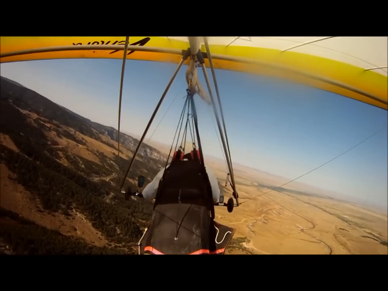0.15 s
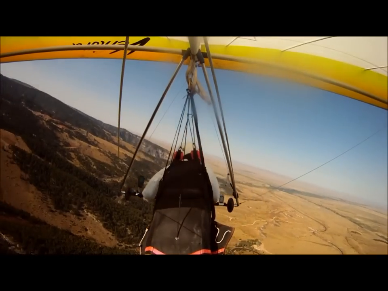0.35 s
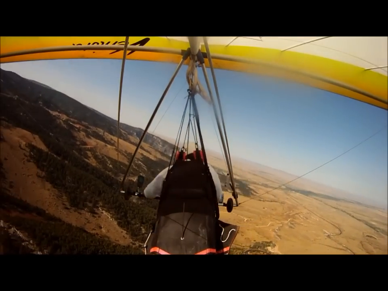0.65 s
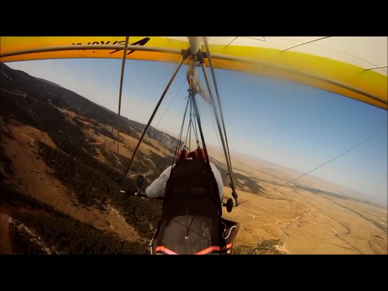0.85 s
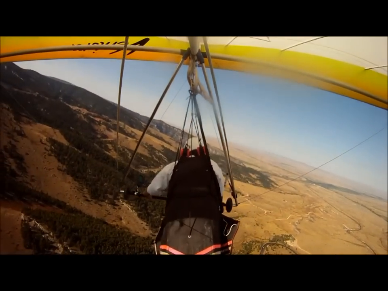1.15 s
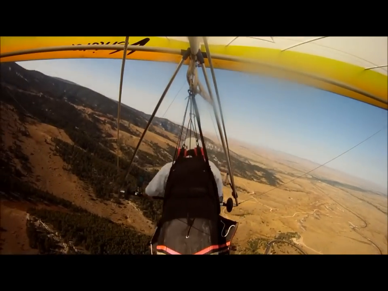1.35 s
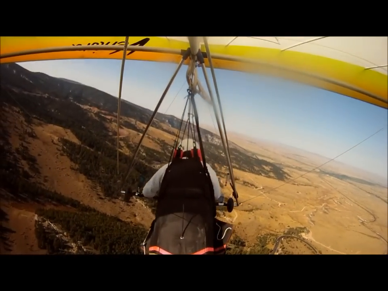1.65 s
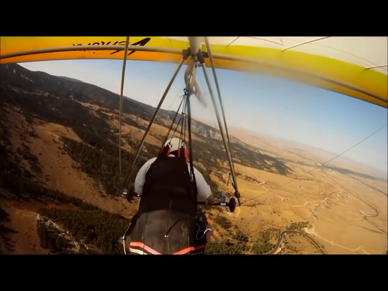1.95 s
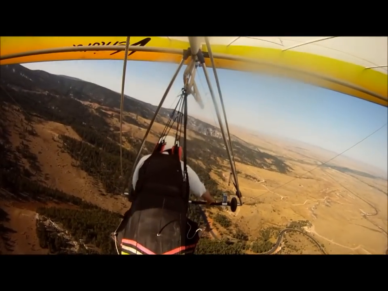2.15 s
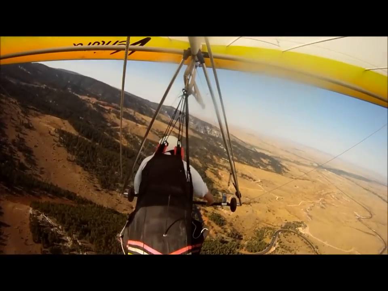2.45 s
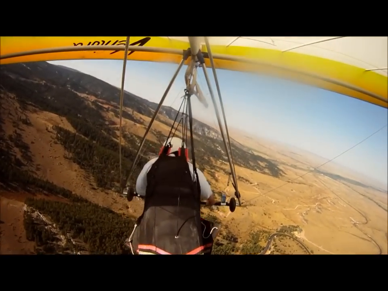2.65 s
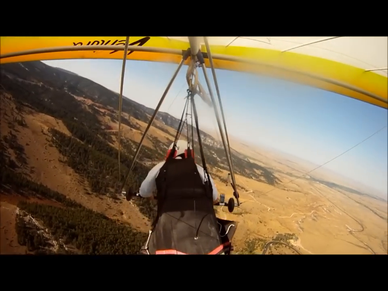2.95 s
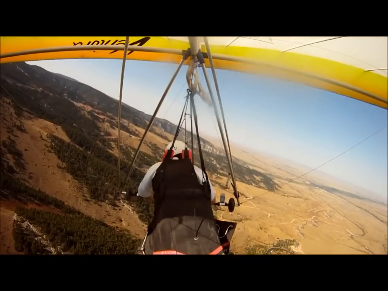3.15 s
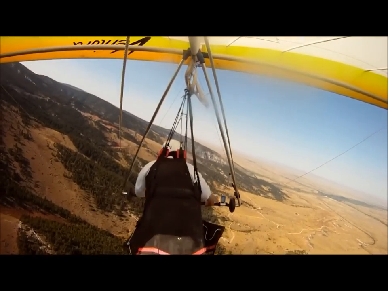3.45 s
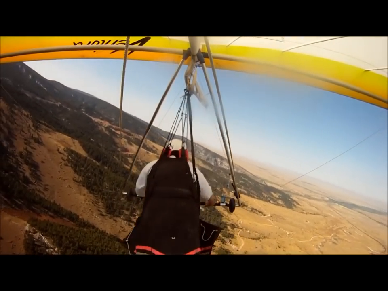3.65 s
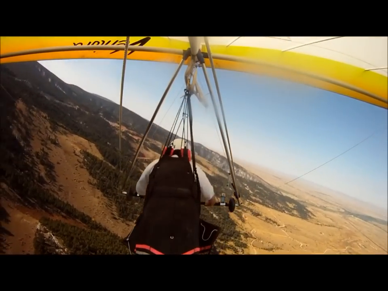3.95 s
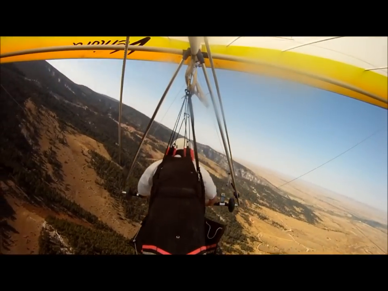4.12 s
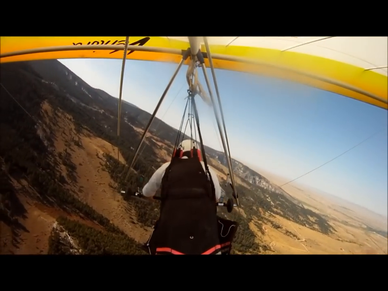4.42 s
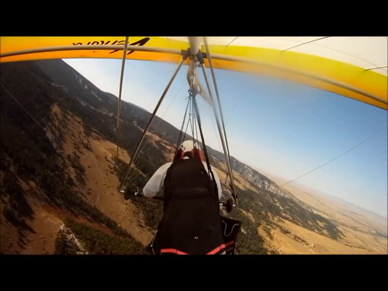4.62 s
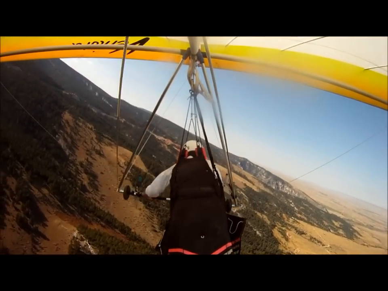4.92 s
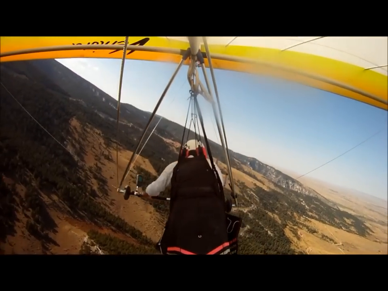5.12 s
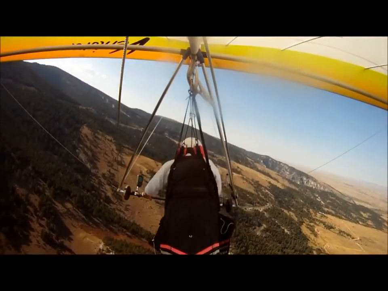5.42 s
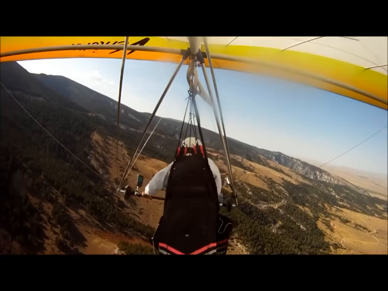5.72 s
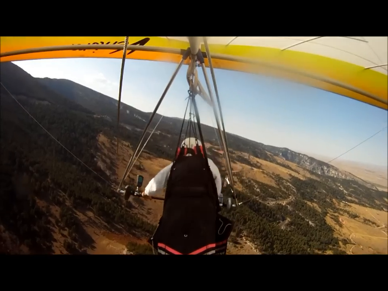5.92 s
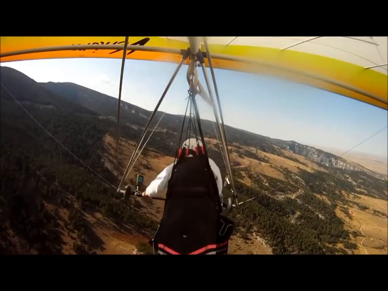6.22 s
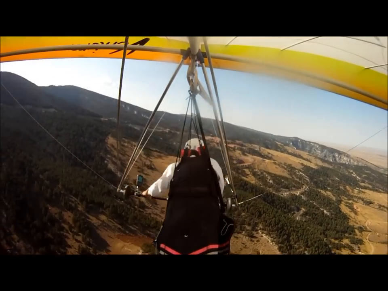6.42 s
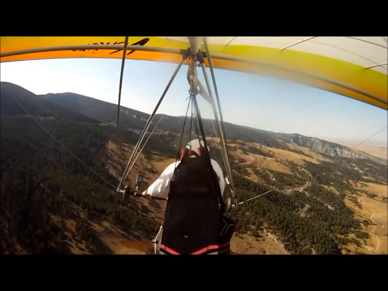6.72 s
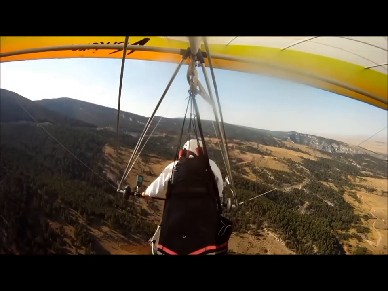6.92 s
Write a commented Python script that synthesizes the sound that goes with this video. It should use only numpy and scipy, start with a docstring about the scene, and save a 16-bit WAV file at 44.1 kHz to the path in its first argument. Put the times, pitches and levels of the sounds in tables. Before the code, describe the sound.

Gusty air buffets a hang glider in flight, with a deep shuddering drone and bursts of plastic rattling from a camera mount.

```python
"""Wind rushes over a camera in a plastic case that rides on the keel (spine) of a hang glider.
Swirls of air shake the mount, so it rumbles, drones and booms, while the keel gives a deep shudder.
In rough air the case knocks and chatters on its mount, and each hit makes the plastic ring.
The microphone adds a faint hiss. The recorder holds each sample at a low rate,
which mirrors the sound into a gritty treble."""
import sys
import numpy as np
from scipy import signal
from scipy.fft import rfft, irfft
from scipy.io import wavfile
from scipy.ndimage import uniform_filter1d

SR = 44100
rng = np.random.default_rng(int(sys.argv[2]) if len(sys.argv) > 2 else 0)


def master(y):
    """Save y as 16-bit WAV."""
    cut = np.clip(np.atleast_2d(y).T, -1, 1)
    pcm = np.round(cut * 32767)  # scale
    wavfile.write(sys.argv[1], SR, pcm.astype(np.int16))


N = 311787

# Strength of the wind over the case. Each row: time in seconds, relative level in dB.
WIND_LEVELS = [(0.0, -46), (0.5, -53.5), (0.65, -49.5), (0.9, -50.5), (1.43, -44.5), (2.35, -42),
               (2.45, -48), (2.6, -43.5), (2.89, -39), (3.3, -40.5), (3.98, -34), (4.03, -40.5),
               (4.65, -43.5), (5.3, -48.5), (5.38, -41), (6.05, -37), (6.7, -38), (7.07, -39.5)]
# Hollows and edges that sing in the wind. Each row: pitch in Hz, width in Hz, relative level in dB.
WIND_TONES = [(605, 260, -37), (736, 350, -16.5), (995, 115, -6), (1135, 108, -5), (1512, 400, -10.5),
              (1978, 127, -0.5), (2150, 330, -4), (2484, 130, -8), (2790, 1280, -18.5), (3200, 170, -24),
              (3542, 260, -10.5), (3740, 280, -18.5), (4200, 380, -34), (4820, 330, -29), (5150, 280, -26)]
# How hard the air shakes the mount. Each row: time in seconds, relative level in dB.
SHAKE_LEVELS = [(0.0, -41), (0.3, -39.5), (0.85, -41.5), (1.78, -41), (1.9, -37), (2.55, -39.5), (4.0, -36),
                (4.8, -38.5), (5.7, -38.5), (6.35, -37.5), (7.07, -38)]
# Deep tones of the mount and frame. Each row: pitch in Hz, width in Hz, relative level in dB.
FRAME_TONES = [(52.3, 47, -2), (71, 18, -4), (88.2, 6.1, 3), (105, 13, -3), (127.5, 19, 1),
               (169.6, 52, -1.5)]
# Higher tones of the mount, which roar. Each row: pitch in Hz, width in Hz, relative level in dB.
ROAR_TONES = [(267, 13, 0), (307.6, 34, 1), (362.7, 118, -4)]
# Swirls of air that slap the mount and make it boom. Each row: time of the peak in seconds, level in dB.
AIR_SLAPS = [(0.755, -33), (2.25, -29.5), (2.34, -28.5), (2.47, -32), (2.951, -30.5), (3.13, -34.5),
             (3.48, -27.5), (3.75, -31), (4.27, -30), (4.71, -35.5), (6.38, -31.5)]
# Strength of the keel's shudder. Each row: time in seconds, relative level in dB.
SHUDDER_LEVELS = [(0.0, -33), (0.45, -39), (1.0, -31.5), (1.5, -27), (1.9, -33.5), (2.0, -21.5),
                  (2.47, -21), (2.77, -43.5), (3.35, -27.5), (3.75, -27), (4.0, -34), (4.7, -35),
                  (5.42, -22.5), (5.8, -31), (6.05, -26), (6.58, -34), (6.98, -20.5), (7.07, -29)]
# Speed of that shudder. Each row: time in seconds, rate in Hz.
SHUDDER_RATES = [(2.55, 24.9), (2.75, 28), (3.48, 25.97), (4.17, 26.36), (4.35, 31.35), (4.98, 24.75)]
# Louder knocks of the case on its mount.
# Each row: start in seconds, relative level in dB, hollowness from 0 (dry) to 1, brightness in dB.
CASE_KNOCKS = [(0.051, -29, 0.46, -3), (0.19, -36.5, 0.43, -19), (0.339, -37.5, .45, -30),
               (0.725, -19, 0.87, 2), (0.793, -34, 0.5, -4), (0.807, -29.5, 0.84, 2),
               (0.949, -27.5, 0.88, 1.5), (0.965, -29, 1, -2), (0.997, -25.3, .4, -5),
               (1.014, -26.5, 0.98, 3), (1.096, -27.5, 0.88, 2), (1.126, -27, 0.47, -14),
               (1.226, -28.2, 0.53, -13), (1.388, -32.5, 0.65, -35), (1.862, -28.5, 1, 4),
               (2.136, -33.6, 0.2, 3), (1.968, -25, .3, 7), (2.035, -25, 0.85, 2), (2.165, -24, 0.5, 4),
               (2.178, -26.5, 0.63, -7), (2.195, -24, 0.34, 3), (2.216, -19, .65, -2),
               (2.245, -24, 0.72, 4), (2.288, -25, 0.33, 4), (2.539, -24.5, 0.88, 1),
               (2.732, -31.5, 0.14, 3), (2.802, -22, 0.17, 4), (2.864, -30.5, 0.43, -7),
               (2.948, -28.5, .55, 1), (3.146, -30, 0.4, -17), (3.253, -27, 0.78, -6),
               (3.269, -24, 0.5, -13), (3.448, -21, 0.64, 0), (3.574, -28, 0.2, -16),
               (3.617, -16.5, 0.1, 4), (3.746, -22, 0.16, -13), (3.877, -25, 0.3, -15),
               (4.196, -24, 0.37, 5), (4.417, -24, 0.87, 3), (4.456, -21.5, .7, -3), (4.481, -27, 0.6, -2),
               (4.497, -21, 0.18, -10), (4.559, -20, 0.62, -8.5), (4.682, -26, 0.85, 3.5),
               (4.806, -30, 0.72, -2), (4.853, -27, 0, 3), (4.9041, -19, 0.74, -6.5),
               (4.94, -21, 0.63, -11), (4.991, -19, 0.78, -5), (5.169, -24, 0.69, -1.5),
               (5.284, -33, 0.9, -7), (6.305, -26, 0.01, 10.5), (6.39, -25, 1, 0.5),
               (6.623, -24.5, .65, -18), (6.665, -31, 0.84, -2), (6.843, -25, 0.33, 1.5),
               (6.937, -36, 1, -12)]
# Spells of fine chatter.
# Each row: start and end in seconds, relative level in dB, hollowness from 0 to 1, brightness in dB.
CHATTER_SPELLS = [(1.019, 1.055, -34.5, 1, -2), (1.855, 1.925, -28.5, 1, -2),
                  (1.925, 2.076, -25.5, 0.73, -1.5), (2.295, 2.34, -25.5, 1, 2),
                  (2.544, 2.568, -28, 0.94, 3), (3.286, 3.358, -29.5, 0.94, -7),
                  (4.51, 4.637, -28.5, 1, 1.5), (4.886, 4.959, -28.5, .86, -6),
                  (4.996, 5.015, -30.5, 0.7, -8), (6.461, 6.575, -28.5, 1, 3)]
# Tones at which the case rings; narrow ones ring longer.
# Each row: pitch in Hz, width in Hz, relative dB at hollow = 0, relative dB at hollow = 1.
# Dry knocks ring about halfway between the two levels, the hollowest ones beyond the second.
CASE_TONES = [(677, 82, -10.5, -5.5), (1066, 22, -11, -6), (1129, 83, -1, 1), (1448, 124, -15.5, -6.5),
              (1757, 56, -8, -9), (1883, 80, 6, -10.5), (2050, 64, 18, -13), (2132, 29, 6, -11),
              (2419, 100, -0.5, -3.5), (2938, 100, -1.5, -16.5), (3340, 320, 9.5, -14),
              (3390, 130, -15.5, -31)]

GROUP_SPLITS_HZ = (1330, 2300)  # these divide the case's tones into low, middle and high
# Each pair: the value for a dry knock, then for a hollow one. The dB are relative to the middle tones.
LOW_TONES_DB, HIGH_TONES_DB, RISE_S = (-19, 9.5), (-11.5, 3.5), (0.0013, 0.0027)


def wind_rush(level_db=2.5, flutter_db=2.0, low_follow=0.55, split_hz=1750, smoothing=0.35):
    """Air rushes over the case: weak wind flutters, strong wind is smoother and brighter."""
    rush = resonant_noise(WIND_TONES)
    low = signal.sosfiltfilt(signal.butter(4, split_hz, fs=SR, output="sos"), rush)
    wind_db = curve(WIND_LEVELS)
    gust_db = wind_db - wind_db.mean()
    sound = low * amp(low_follow * gust_db) + (rush - low) * amp(gust_db)
    flicker_db = flutter_db * amp(-smoothing * gust_db) * flutter(60)
    return sound * amp(level_db + wind_db.mean() + flicker_db)


def mount_shaking(jolt, frame_db=1.07, drone_db=-1.8, roar_db=-11.5, lumps_db=1.5, boom_s=0.028,
                  drone_hz=211, drone_width_hz=29, drone_follow=0.88, jolt_roar_db=-12, jolt_drone_db=-9):
    """Swirls of air shake frame and mount, big ones boom, and the rattling case adds jolts."""
    t = np.arange(N) / SR
    lumps = amp(lumps_db * flutter(35))
    shake_db = curve(SHAKE_LEVELS)
    frame = steady(resonant_noise(FRAME_TONES), 0.14) * amp(shake_db + frame_db)
    roar_level = np.hypot(amp(shake_db + roar_db), amp(jolt_roar_db) * jolt)
    roar = steady(resonant_noise(ROAR_TONES), 0.07) * roar_level
    booms = sum(amp(db) * np.exp(-.5 * ((t - peak) / boom_s) ** 2) for peak, db in AIR_SLAPS)
    sway = amp(shake_db.mean() + drone_follow * (shake_db - shake_db.mean()) + drone_db)
    drone_level = np.sqrt(sway ** 2 + booms ** 2 + (amp(jolt_drone_db) * jolt) ** 2)
    drone = steady(resonant_noise([(drone_hz, drone_width_hz, 0)]), 0.085) * drone_level
    return (frame + roar) * lumps + drone


def keel_shudder(level_db=-1.0, waver_db=3.0, thud_db=-1.0, thud_hz=36, thud_width_hz=18):
    """The keel bends to and fro at its lowest pitch; big swirls of air add thuds just above it."""
    turns = np.cumsum(curve(SHUDDER_RATES)) / SR
    swing_level = amp(curve(SHUDDER_LEVELS) + level_db + waver_db * flutter(2.4))
    swing = np.sqrt(2) * np.sin(2 * np.pi * turns) * swing_level
    thuds = resonant_noise([(thud_hz, thud_width_hz, 0)]) * amp(curve(SHAKE_LEVELS) + thud_db)
    return swing + thuds


def case_knocks(level_db=-1.5, buzz_db=-26, hollow_buzz_db=7, settle_s=0.043, snap_db=-24, muffle=0.43):
    """Each knock is a burst of tiny hits that settles in a buzz. Returns the ringing and the snap."""
    t = np.arange(round(.14 * SR)) / SR
    body, snap = np.zeros(N), np.zeros(N)
    attack = round(.015 * SR)  # the opening samples set a knock's level
    groups = np.searchsorted(GROUP_SPLITS_HZ, [tone[0] for tone in CASE_TONES])
    for start, db, hollowness, bright_db in CASE_KNOCKS:
        low_db = np.interp(hollowness, (0, 1), LOW_TONES_DB)
        high_db = np.interp(hollowness, (0, 1), HIGH_TONES_DB)
        shares = amp([low_db, 0, high_db + bright_db])
        gains = amp(db) * shares / np.linalg.norm(shares)
        hollow = 1 + np.tanh((low_db - 3) / 4) / 2  # 0.5 to 1.5: knocks with strong low tones ring on
        rise = t / np.interp(hollowness, (0, 1), RISE_S)  # hollow knocks land more softly
        push = (rise * np.exp(1 - rise)) ** 1.01
        buzz = amp(buzz_db + hollow * hollow_buzz_db) * (1 - np.exp(-rise)) * np.exp(-t / settle_s)
        force = (push + buzz) * tiny_hits(len(t), per_s=6000)
        tones = case_ringing(force, hollow)
        for group, gain in enumerate(gains):
            sound = tones[groups == group].sum(0)
            add(body, start, gain * amp(level_db) * sound / np.std(sound[:attack]))
        snap_gain = gains[-1] * amp(snap_db) * (1 - muffle * hollow)  # dry knocks snap most
        add(snap, start, snap_gain * force / np.std(force[:attack]))
    return body, snap


def case_chatter(spell_db=-1, idle_db=-16, per_s=1500, idle_per_s=45, clump_db=2.5):
    """Small hits ring the case: thick and clumped in rough air, few and faint in between."""
    ticks = case_ringing(tiny_hits(N, idle_per_s), hollow=0.35).sum(0)
    chatter = unit(ticks) * amp(curve(WIND_LEVELS) + idle_db)
    clumps = amp(clump_db * flutter(87))
    is_high = np.array([tone[0] > GROUP_SPLITS_HZ[-1] for tone in CASE_TONES])
    for start, end, db, hollow, bright_db in CHATTER_SPELLS:
        clump = clumps[round(start * SR):round(end * SR)]
        force = clump * tiny_hits(len(clump), per_s)
        buzz = unit(amp(bright_db * is_high) @ case_ringing(force, hollow))
        add(chatter, start, amp(db + spell_db) * buzz * signal.windows.tukey(len(clump), .2))
    return chatter


def case_ringing(force, hollow, ring_on=0.24, detune=0.0096, scatter_db=1.5):
    """The struck case's tones, one row each; a hollow hit shifts their balance and rings longer."""
    damping = 1 - ring_on * hollow
    chance = rng.standard_normal((len(CASE_TONES), 2))  # no two hits land alike
    tones = []
    for (hz, width_hz, db_at_0, db_at_1), (shift, strength) in zip(CASE_TONES, chance):
        db = db_at_0 + hollow * (db_at_1 - db_at_0) + scatter_db * strength
        tones.append(amp(db) * unit(ring(force, hz * (1 + detune * shift), width_hz * damping)))
    return np.array(tones)


def mount_jolt(rattle, linger_s=0.021):
    """How hard the case's low tones shake the mount, which takes a moment to settle."""
    power = band(rattle, 696, 1290, order=2) ** 2
    decay = np.exp(-1 / (linger_s * SR))
    return np.sqrt(signal.lfilter([1 - decay], [1, -decay], power))


def microphone_hiss(level_db=-75):
    """The microphone's own faint hiss."""
    return amp(level_db) * unit(band(rng.standard_normal(N), 300, 6000, order=2))


def tiny_hits(size, per_s):
    """Clicks of random strength at random times."""
    return rng.standard_normal(size) * (rng.random(size) < per_s / SR)


def ring(force, hz, width_hz):
    """One tone that rings and fades after each push."""
    pole = np.exp((2j * np.pi * hz - np.pi * width_hz) / SR)
    return signal.lfilter([1], [1, -pole], force).imag


def resonant_noise(tones):
    """The noise of swirling air, strongest around the given tones."""
    hz = np.fft.rfftfreq(N, 1 / SR)
    power = sum((amp(db) / (1 + (2 * (hz - centre) / width) ** 2)) ** 2 for centre, width, db in tones)
    return unit(irfft(rfft(rng.standard_normal(N)) * np.sqrt(power), N))


def flutter(rate_hz):
    """A random wobble, up to about the given rate."""
    hz = np.fft.rfftfreq(N, 1 / SR)
    return unit(irfft(rfft(rng.standard_normal(N)) * hz / (hz + 4) / (1 + (hz / rate_hz) ** 2), N))


def steady(x, window_s):
    """Evens out the slow swells of a noise and keeps its fast ones."""
    size = round(window_s * SR)
    power = uniform_filter1d(uniform_filter1d(x ** 2, size), size)
    return x / np.sqrt(np.maximum(power, 1e-6))


def band(x, low_hz, high_hz, order):
    """Keeps the sound between two frequencies."""
    return signal.sosfilt(signal.butter(order, [low_hz, high_hz], "band", fs=SR, output="sos"), x)


def curve(rows):
    """Joins (time, value) rows with straight lines, giving a value for every sample."""
    times, values = np.transpose(rows)
    return np.interp(np.arange(N) / SR, times, values)


def add(mix, start_s, sound):
    """Mixes a sound in at the given time."""
    part = mix[round(start_s * SR):][:len(sound)]
    part += sound[:len(part)]


def amp(db):
    """Turns decibels into a multiplier."""
    return 10 ** (np.asarray(db) / 20)


def unit(x):
    """Scales a signal to an average (rms) level of 1."""
    return x / np.sqrt(np.mean(x ** 2) + 1e-20)


def scene(leak_db=11, fizz_db=-5):
    """Mixes all the sources. The case lets little above 4 kHz through, apart from a leak near 5 kHz."""
    body, snap = case_knocks()
    rattle = band(body + case_chatter(), 736, 3687, order=8)
    leak = amp(leak_db) * band(snap, 4700, 5620, order=3)
    faint_fizz = amp(fizz_db) * band(snap, 4770, 7540, order=2)  # heard with each knock
    wind = wind_rush() + mount_shaking(mount_jolt(rattle)) + keel_shudder()
    return (wind + rattle + leak + faint_fizz + microphone_hiss())[None]


def record(dry, hold_hz=12000, mirror_db=1.4, lowest_hz=45, top_hz=15330):
    """Holding samples mirrors all but the deepest bass around the hold rate; the very top is cut off."""
    above_bass = signal.sosfilt(signal.butter(2, lowest_hz, "high", fs=SR, output="sos"), dry)
    mirrored = above_bass * 2 * np.cos(2 * np.pi * hold_hz * np.arange(N) / SR)
    droop = np.sinc(np.fft.rfftfreq(N, 1 / SR) / hold_hz)  # weakest at the hold rate itself
    held = dry + amp(mirror_db) * irfft(rfft(mirrored) * droop, N)
    low_pass = signal.firwin(301, top_hz, window=("kaiser", 9), fs=SR)
    return signal.oaconvolve(held, low_pass[None], "same")


dry = scene()
out = record(dry)
master(out)
```